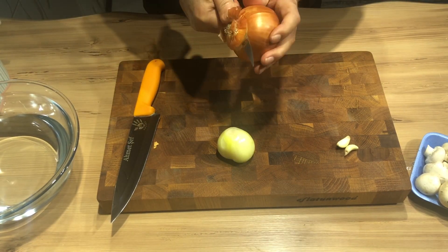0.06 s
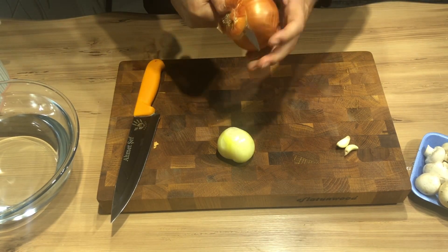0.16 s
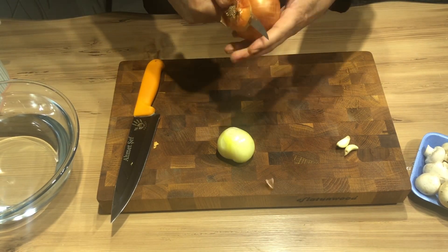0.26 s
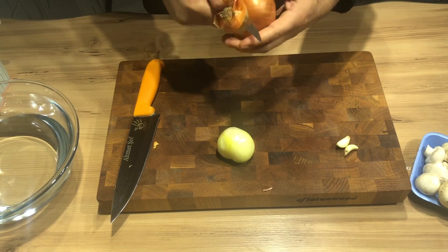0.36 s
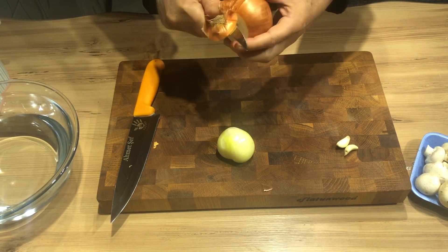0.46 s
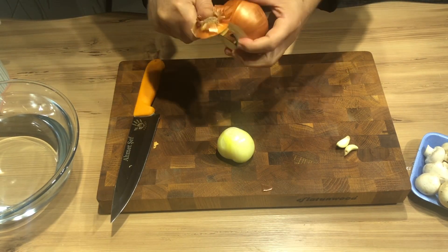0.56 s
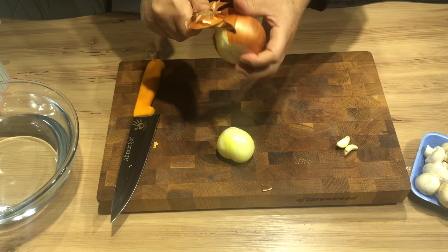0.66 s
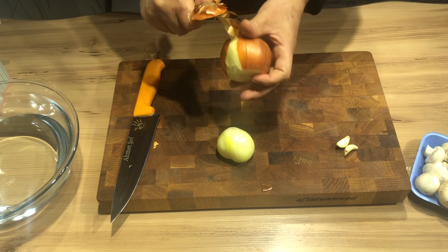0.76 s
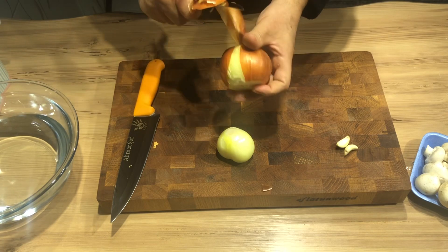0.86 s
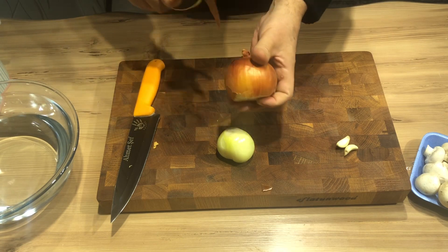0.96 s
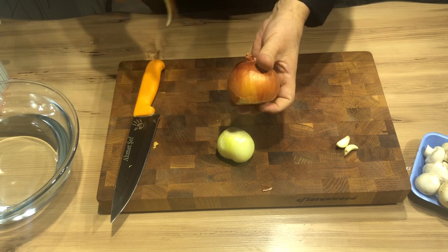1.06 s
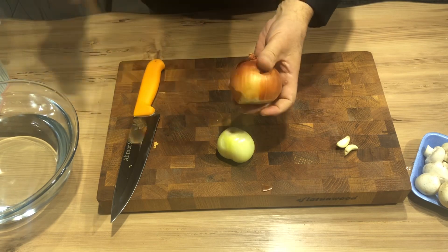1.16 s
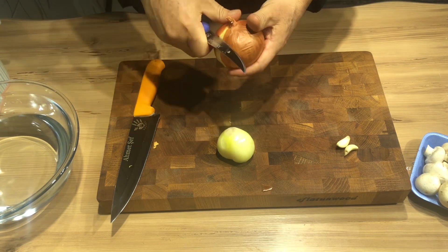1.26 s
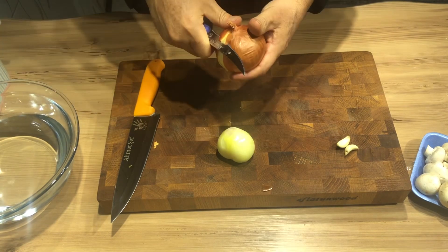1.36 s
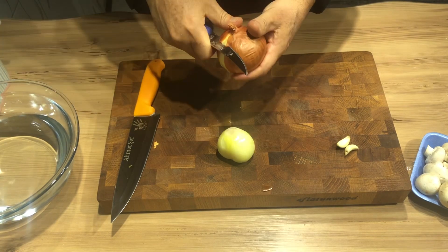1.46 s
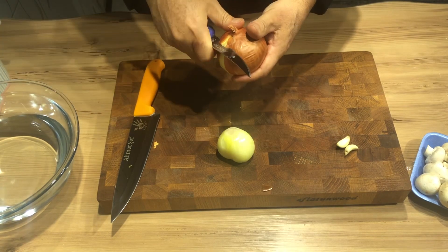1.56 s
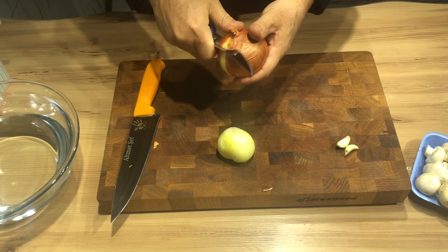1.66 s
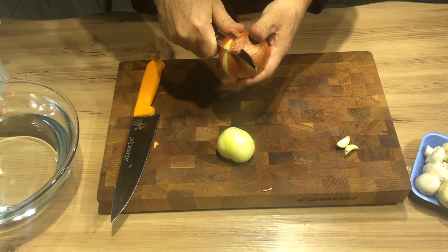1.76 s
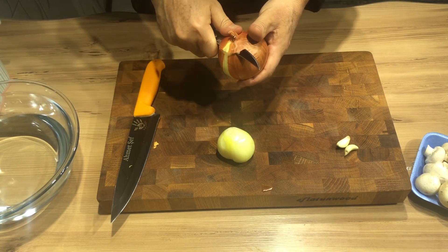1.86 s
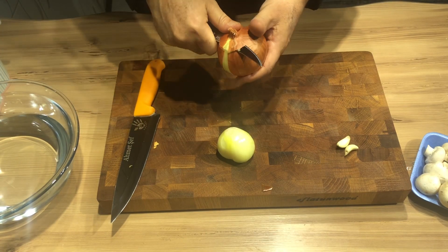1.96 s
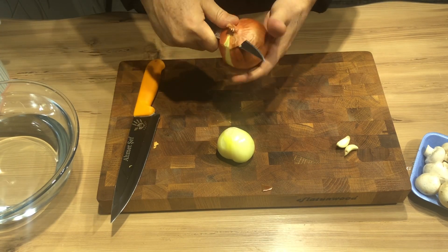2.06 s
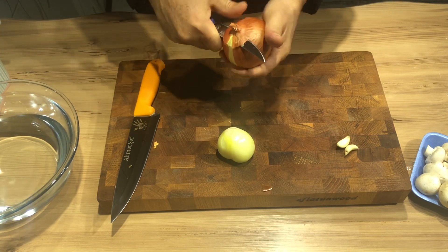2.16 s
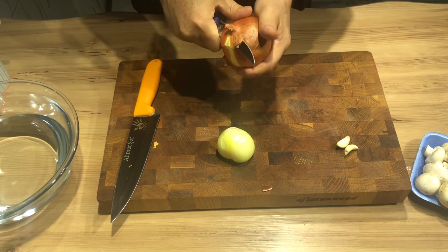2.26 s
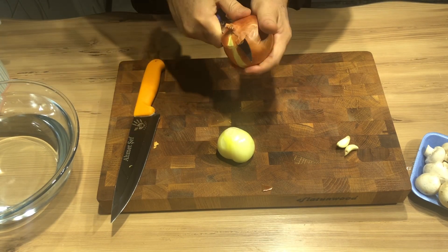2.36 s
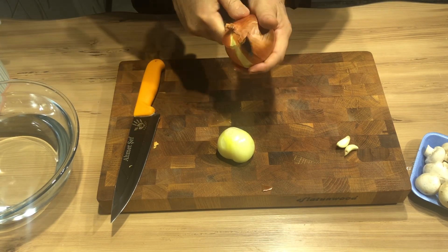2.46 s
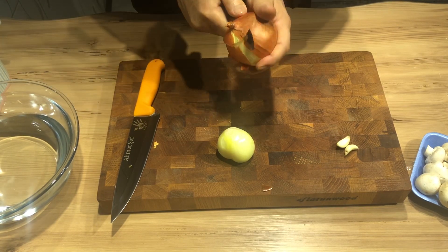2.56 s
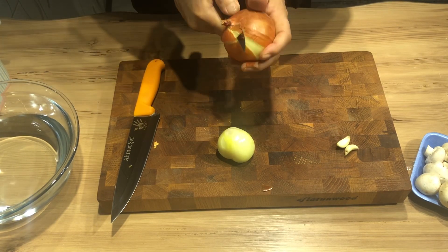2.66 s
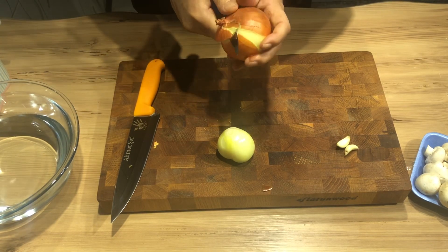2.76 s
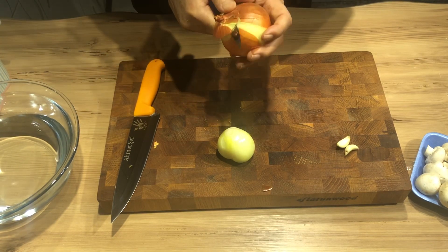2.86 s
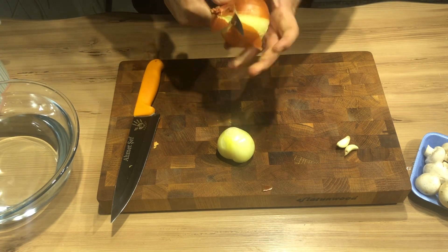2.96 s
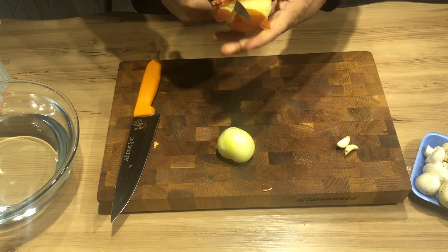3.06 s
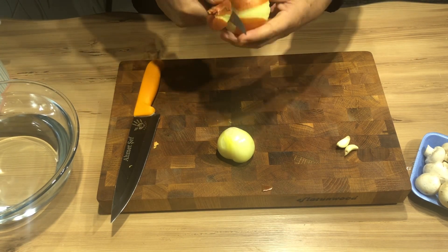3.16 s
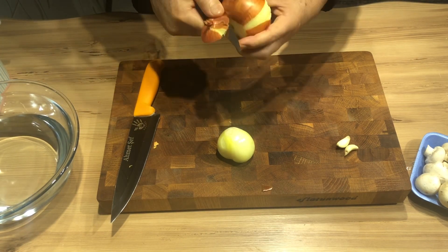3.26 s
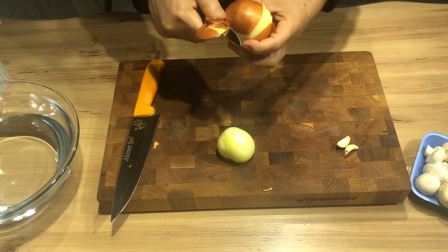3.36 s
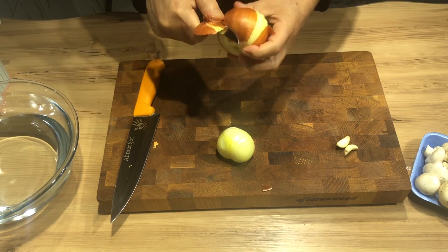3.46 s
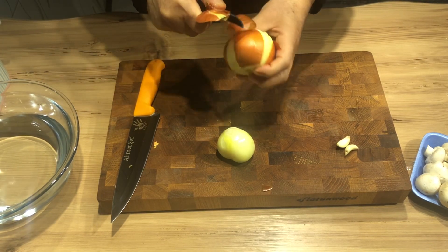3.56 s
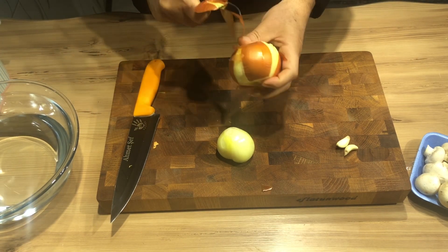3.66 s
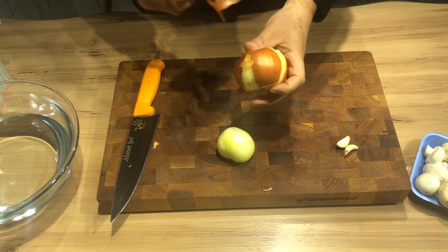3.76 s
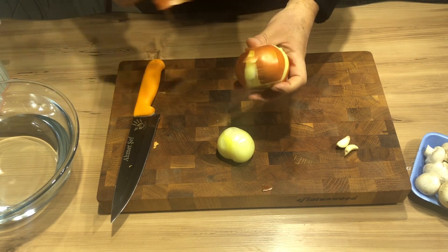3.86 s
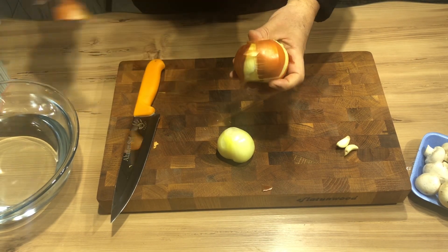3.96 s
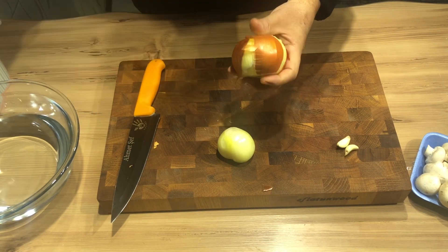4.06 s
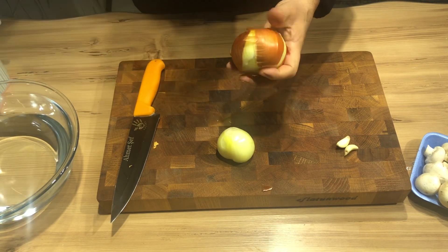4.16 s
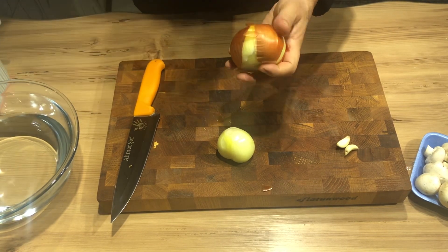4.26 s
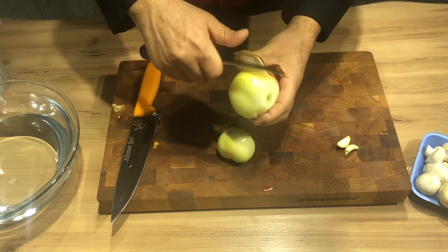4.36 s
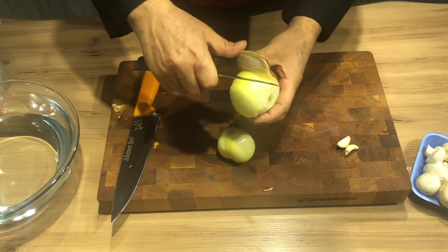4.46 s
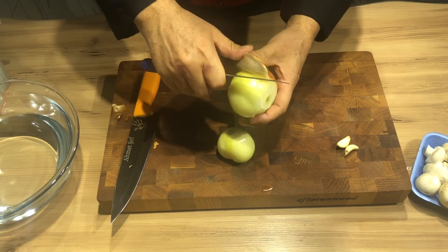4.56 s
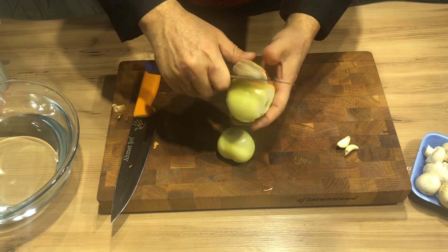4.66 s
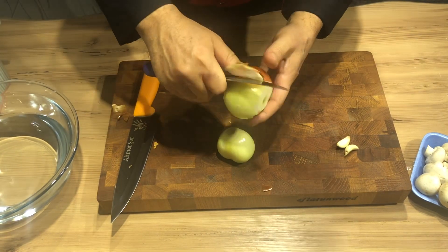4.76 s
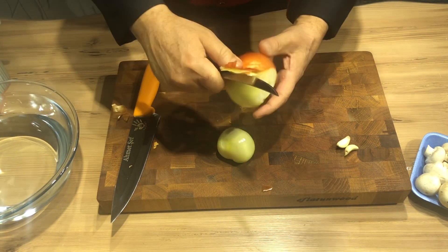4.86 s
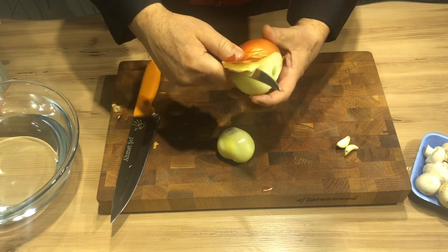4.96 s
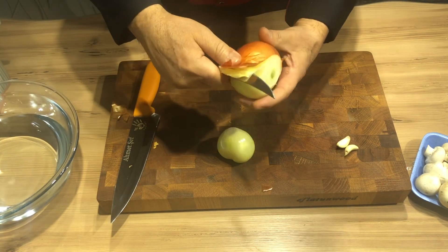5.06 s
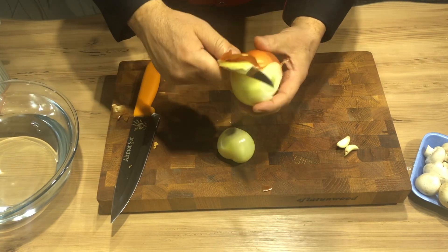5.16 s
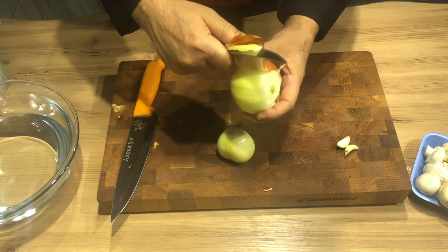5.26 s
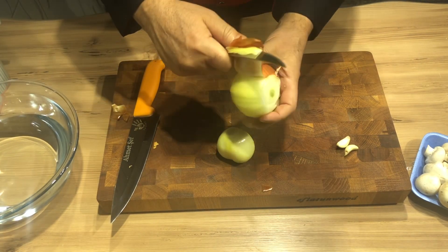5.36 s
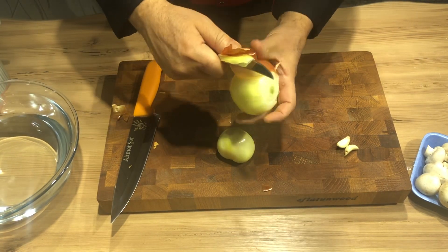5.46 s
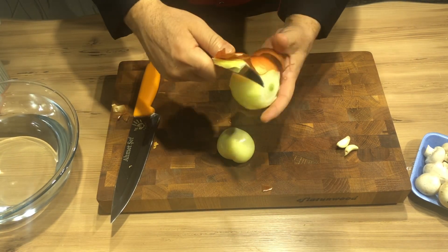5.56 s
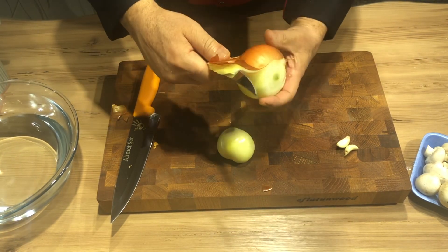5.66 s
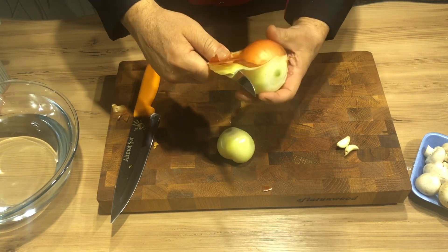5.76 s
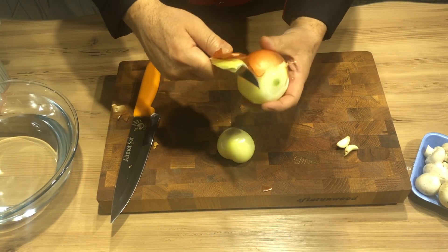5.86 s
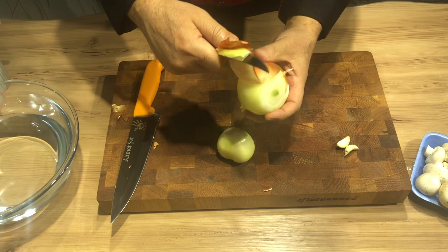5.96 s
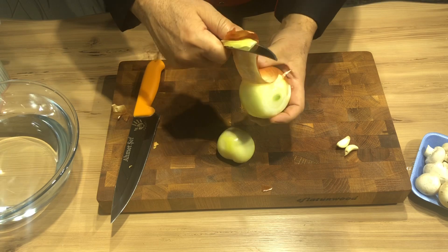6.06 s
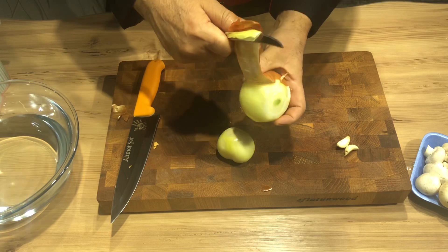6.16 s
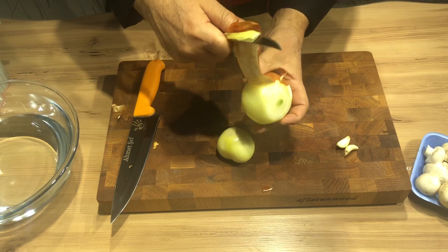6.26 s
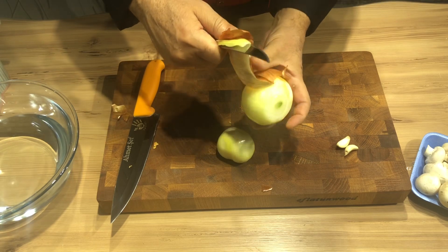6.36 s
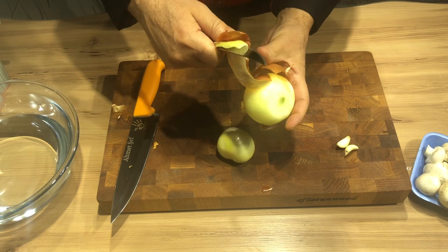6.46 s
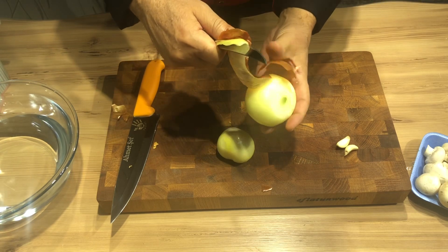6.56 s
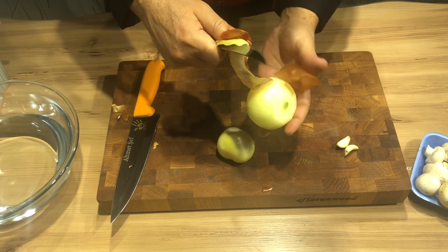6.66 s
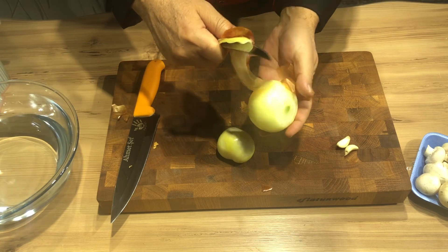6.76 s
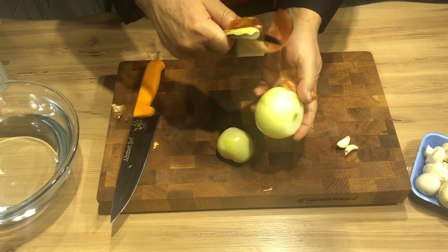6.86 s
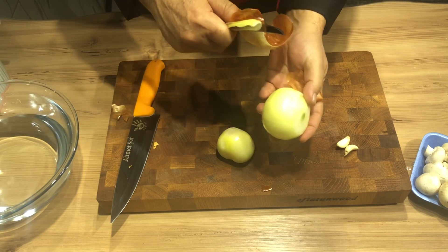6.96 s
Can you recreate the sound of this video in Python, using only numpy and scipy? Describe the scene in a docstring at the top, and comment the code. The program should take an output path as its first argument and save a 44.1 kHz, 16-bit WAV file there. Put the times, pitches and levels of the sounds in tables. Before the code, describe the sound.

Dry, papery onion skin crackles, snaps and tears in irregular bursts close by, with brief scrapes and quiet gaps in a small humming kitchen.

```python
"""Dry onion skin is prised up with a small knife and torn off by hand over a cutting board.
The skin rustles as filtered noise shaped by countless random cracks, and snaps where a larger fold breaks;
short resonances add thumps, knocks and rings, and soft low noise gives rubbing fingers and low thumps.
A small kitchen answers with decaying noise, over room air, an appliance hum and a thin whine."""
import sys
import numpy as np
from scipy import signal
from scipy.fft import rfft, irfft, next_fast_len
from scipy.io import wavfile
from scipy.ndimage import uniform_filter1d, map_coordinates

SR = 44100
rng = np.random.default_rng(int(sys.argv[2]) if len(sys.argv) > 2 else 0)


def master_out(mix):
    """Clip the mix to full scale and print it as 16-bit PCM to the path in sys.argv[1]."""
    frames = np.transpose(np.atleast_2d(mix))
    ceiling = np.clip(frames, -1, 1)
    pcm = np.round(ceiling * 32767).astype(np.int16)
    wavfile.write(sys.argv[1], SR, pcm)


N = 308700

USUAL_DB = -49.5  # an ordinary pull, the reference for crack rate and body weight


def amp(db):
    """Level to amplitude: 20 dB is a factor of ten."""
    return 10 ** (np.asarray(db) / 20)


def unit(x):
    """Normalisation by mean power: each row gets rms 1."""
    return x / np.sqrt(np.mean(x ** 2, axis=-1, keepdims=True) + 1e-30)


def clock():
    """Uniform sampling: the time of every sample in seconds."""
    return np.arange(N) / SR


def along(points, hz):
    """Interpolation on a logarithmic frequency axis through (Hz, value) points."""
    point_hz, values = np.transpose(points)
    return np.interp(np.log(hz + 1), np.log(point_hz + 1), values)


def wobble(rate):
    """Band-limited random modulation: a smooth curve through `rate` random knots a second."""
    knots = rng.standard_normal(int(N * rate / SR) + 4)
    return map_coordinates(knots, [clock() * rate])


def coloured(x, spectrum, size=8192):
    """Minimum-phase filtering: a folded cepstrum gives a causal response, so clicks keep a sharp front."""
    log_gain = np.log(amp(along(spectrum, np.fft.rfftfreq(size, 1 / SR))))
    cepstrum = irfft(log_gain)
    cepstrum[1:size // 2] *= 2
    cepstrum[size // 2 + 1:] = 0
    response = irfft(np.exp(rfft(cepstrum)))
    padded = next_fast_len(x.shape[-1] + size)
    filtered = irfft(rfft(x, padded) * rfft(response, padded), padded)
    return filtered[..., :x.shape[-1]]


def background(air_db=-66.0, drift_rad=0.38, whine_hz=3046, whine_drift_rad=0.61):
    """Stationary noise plus sinusoids with random phase: room air, an unsteady hum and a thin whine."""
    # spectrum of the steady kitchen air: frequency_hz, relative_db
    air_spectrum = [(22, -45), (36, -26), (50, 0.5), (80, -5), (140, -4), (400, -7), (620, -10.5),
                    (800, -14), (1500, -21.5), (3000, -27.5), (8000, -21.5), (16000, -31.5)]
    # appliance tones, before their slow level wobble: frequency_hz, rms_db
    hum_tones = [(98, -73), (143, -73.5), (541, -74.5), (591, -75)]
    # level course of the thin whine: time_s, rms_db
    whine_course = [(0, -76), (4.3, -82), (4.36, -75), (7, -71)]

    def tone(hz, phase_rad):
        """Phase-modulated sinusoid of rms 1."""
        return np.sqrt(2) * np.sin(2 * np.pi * hz * clock() + phase_rad)

    hum = sum(amp(db + 1.6 * wobble(5.6)) * tone(hz, drift_rad * wobble(27)) for hz, db in hum_tones)
    whine_s, whine_db = np.transpose(whine_course)
    whine_level = amp(np.interp(clock(), whine_s, whine_db))
    whine = whine_level * tone(whine_hz, whine_drift_rad * wobble(38))
    air = amp(air_db) * unit(coloured(rng.standard_normal(N), air_spectrum))
    return hum + whine + air


def kitchen(x, build_s=0.003, count=24):
    """Reverberation as exponentially decaying noise; successive tails differ as the hands move about."""
    # reverberation of the kitchen: frequency_hz, t60_s
    decay_times = [(200, 0.97), (1300, 0.81), (3500, 0.51), (9000, 0.28), (16000, 0.16)]
    hz, t, z = signal.stft(rng.standard_normal((count, SR // 2)), SR, nperseg=256)
    decay = amp(-60 * t / along(decay_times, hz)[:, None])
    tails = signal.istft(z * decay, SR, nperseg=256)[1]
    length = tails.shape[1]
    # the first walls answer only after a few milliseconds
    build_up = 1 - np.exp(-(np.arange(length) / SR / build_s) ** 2)
    tails = unit(tails * build_up) / np.sqrt(length)  # each tail has energy 1
    wet = np.zeros(N + SR)
    for part, tail in zip(np.array_split(np.arange(N), count), tails):
        answer = signal.fftconvolve(x[part], tail)
        wet[part[0]:part[0] + len(answer)] += answer
    return wet[:N]


def rubs_and_thumps():
    """Low-passed noise under smooth envelopes: fingers rub on the bulb, and tearing thumps softly."""
    # fingers rubbing on the bulb and low thumps of tearing, as bell-shaped swells:
    # middle_s, half_length_s, level_db
    low_swells = [(0.635, 0.011, -57), (0.937, 0.034, -67), (2.741, 0.022, -62), (3.376, 0.14, -60),
                  (3.529, 0.023, -57.5), (5.2, 0.11, -67), (6.793, .025, -63)]
    # spectrum of these dull sounds: frequency_hz, relative_db
    dull_spectrum = [(40, -30), (140, 2), (200, -6), (290, -1.5), (450, -11.5), (800, -28), (2000, -52),
                     (6000, -89)]
    envelope = sum(amp(db) * np.exp(-((clock() - s) / half) ** 2) for s, half, db in low_swells)
    return envelope * unit(coloured(rng.standard_normal(N), dull_spectrum))


def resonant(x):
    """Forced resonance: for short spells the crackle excites a broad peak at one pitch."""
    # short resonances: low thumps, dull knocks and bright rings in the crackle:
    # middle_s, half_length_s, pitch_hz, gain
    resonances = [(.115, 0.021, 1280, 3), (0.65, 0.011, 420, 4.5), (0.63, 0.011, 670, 4.8),
                  (0.722, 0.048, 3600, 3.1), (.92, .025, 384, 3.6), (1.243, 0.037, 3420, 2.9),
                  (1.683, 0.018, 15500, 1.7), (2.894, 1, 1400, 0.49), (3, 0.7, 4220, 1.2),
                  (4.287, .012, 1690, 8.5), (5.636, 0.012, 1900, 2.3), (5.924, 0.0099, 4130, 1.4),
                  (6.166, 0.054, 2100, 3.4), (6.638, 0.062, 1570, 3.5), (6.755, 0.022, 3100, 2.6),
                  (6.784, 0.0065, 1080, 8.6), (6.79, 0.025, 383, 2.1)]
    out = x.copy()
    for s, half, hz, gain in resonances:
        held = gain * np.exp(-((clock() - s) / half) ** 2)
        out += signal.lfilter(*signal.iirpeak(hz, 4.5, fs=SR), held * x)  # Q of 4.5
    return out


def papery(cracks, body_db, sparkle_db, low_hz=2400, high_hz=9600):
    """Radiation of a thin sheet: coloured cracks in three bands, body and sparkle set against the middle."""
    # spectrum that the dry skin radiates: frequency_hz, relative_db
    skin_spectrum = [(40, -46), (170, -20.5), (400, -15.5), (950, -14.5), (1400, -9), (1900, -8),
                     (2800, -2.5), (3500, 5.5), (4300, 7), (5200, 10.5), (8000, 6.5), (12000, -0.5),
                     (15500, 3)]
    sound = coloured(cracks, skin_spectrum)

    def band(edge_hz, kind):
        """Butterworth band selection, scaled to rms 1."""
        sos = signal.butter(3, edge_hz, kind, fs=SR, output="sos")
        return unit(signal.sosfilt(sos, sound))

    body, sparkle = amp(body_db), amp(sparkle_db)
    middle = band([low_hz, high_hz], "band")
    mix = body * band(low_hz, "low") + middle + sparkle * band(high_hz, "high")
    return mix / np.sqrt(body ** 2 + 1 + sparkle ** 2)


def effort(step=32):
    """Power addition of strokes that catch, build or ease, and let go: pull dB, body dB, sparkle dB, hiss."""
    # pulls that tear the skin: start_s, length_s, level_db (mid-stroke), build_db (start to end), sparkle_db
    tear_strokes = [(0, 0.026, -39.5, -25, -1), (0.079, 0.046, -47, 0, -15), (0.2, 0.2, -63.5, -15, 1),
                    (0.341, 0.13, -47, 4.5, -0.5), (0.486, 0.13, -38, 1, 2), (.622, 0.069, -25.5, -5.5, 3),
                    (0.917, 0.065, -49, -1, -7), (1.472, 0.029, -45.5, -1, -2.5),
                    (1.638, 0.088, -42, 3, 1.5), (1.83, 0.056, -48, 1, -3), (1.974, 0.095, -58.5, -10, 1),
                    (2.475, 0.063, -41, -8, 2), (2.632, 0.22, -53, -7.5, 2.5), (2.861, 0.083, -45, -1, 2.5),
                    (2.95, 0.2, -66, 12.5, 6), (3.331, 0.1, -44, -10.5, 6), (3.453, 0.12, -39, 15.5, 6),
                    (4.09, 0.27, -65.5, -11, 6), (4.63, 0.33, -61, -2, -1.5), (5.082, 0.04, -53.5, 16, 2),
                    (5.117, 0.12, -42.5, 6, -1), (5.246, 0.073, -37, 5, 4), (5.412, 0.18, -56.5, -6.5, 7),
                    (5.586, 0.075, -50, -7.5, -2.5), (5.716, 0.19, -55.5, 7, 0), (5.859, 0.12, -40, 5, 7),
                    (5.968, 0.19, -51.5, -21.5, 2), (6.128, 0.088, -37.5, 4, 9), (6.526, .1, -62, 3, 8),
                    (6.639, 0.091, -49, 12, 2.5), (6.746, 0.048, -39.5, 8.5, -2.5),
                    (6.807, 0.044, -48, 2, -7)]
    # blade or skin sliding without catching: start_s, length_s, level_db, build_db, sparkle_db
    slide_strokes = [(.7, .13, -41, -7, 5), (0.829, 0.088, -39, 10.5, 2), (1.066, 0.14, -55.5, 10, -5),
                     (1.213, 0.084, -49, -6, -1), (1.3, 0.065, -48, 2, -1.5), (2.178, .295, -54.5, 1, -1.5),
                     (2.529, 0.085, -51, 1, 3), (3.11, 0.097, -51, 28, 12), (3.21, 0.11, -46, -4, 10.5),
                     (3.564, 0.11, -42, 1.5, 6)]
    attack_s, release_s = 0.0083, 0.0063  # the skin catches and lets go this fast
    rest_db = -72.5  # the bulb merely held in the hand
    tear_hiss, slide_hiss = 0.08, 0.74  # share of the rustle that is smooth hiss
    body_db, body_per_db = -4.5, -0.153  # low band at an ordinary pull; harder pulls sound thinner
    t = clock()[::step]
    strokes = np.vstack([tear_strokes, slide_strokes])
    start, length, db, build_db, sparkle_db = np.transpose(strokes)[:, :, None]
    age = t - start
    envelope = np.clip(age / attack_s, 0, 1) * np.exp(-np.maximum(age - length, 0) / release_s)
    progress = np.clip(age / length, 0, 1)
    power = (envelope * amp(db + build_db * (progress - .5))) ** 2
    total = power.sum(0) + amp(rest_db) ** 2
    pull_db = 10 * np.log10(total)
    body = body_db + body_per_db * (pull_db - USUAL_DB)
    sparkle = (power * sparkle_db).sum(0) / total  # mean weighted by power
    sliding = power[len(tear_strokes):].sum(0) / total
    hiss = np.clip(tear_hiss + (slide_hiss - tear_hiss) * sliding, 0, 1)
    return [np.interp(clock(), t, c) for c in (pull_db, body, sparkle, hiss)]


def ticks(controls, count=270):
    """Random, uniformly scattered lesser snaps as rows of time_s, level_db, sparkle_db; size follows the pull."""
    over_db, top_db = 5.5, -38.5  # mean level over the rustle before the hiss cut, and the upper limit
    draws = rng.standard_normal((count, 2))
    s = rng.uniform(0, N / SR, count)
    pull_db, _, sparkle, hiss = [c[(s * SR).astype(int)] for c in controls]
    db = pull_db + over_db - 14 * hiss + 3 * draws[:, 0]
    sparkle = sparkle + 3 * draws[:, 1]
    return np.transpose([s, np.minimum(db, top_db), sparkle])


def snaps(rows, spike, flutter_gain, board_gain, size=1024, order=130):
    """Impulsive fracture: a sharp break, a bounce off the board and a short flutter of the freed flake."""
    s, db, sparkle = np.transpose(rows)[:, :, None]
    body = -4.5 - 0.3462 * (db - USUAL_DB)  # low-band weight in dB; faint snaps are duller than loud ones
    t = (np.arange(size) - order) / SR  # the break falls on sample `order`

    def packet(age, life_s):
        """Sudden onset with exponential decay."""
        return (age >= 0) * np.exp(-np.abs(age) / life_s)

    # the hands move and tilt the flake, so the bounce has a new delay and strength each time
    delay_s = rng.uniform(.0011, .0016, (len(s), 1))
    bounce = board_gain * rng.uniform(.3, 1, (len(s), 1))
    swell = packet(t, .00022) + bounce * packet(t - delay_s, .0003)
    # each snap has a random amount of soft noise around its sharp break
    soft_noise = rng.uniform(0, .8, (len(s), 1)) * np.exp(-((t - .001) / .003) ** 2)
    swell += flutter_gain * (packet(t, .0024) + soft_noise)
    crack = swell * rng.standard_normal((len(s), size))
    crack[:, order] = spike
    # a snap's level is its energy spread over 5 ms
    spread = np.sqrt(.005 * SR / size)
    sounds = amp(db) * spread * unit(papery(crack, body, sparkle))
    where = np.abs(np.round(s * SR).astype(int) + np.arange(size) - order)
    return np.bincount(where.ravel(), sounds.ravel(), N)[:N]


def rustle(pull_db, body, sparkle, hiss, rate=430, crowding_db=45):
    """Crackling noise: random cracks come thicker with a harder pull, over the hiss of skin sliding on skin."""
    # `rate` cracks a second at an ordinary pull, ten times as many for each crowding_db above it
    per_second = rate * 10 ** ((pull_db - USUAL_DB) / crowding_db)
    sizes = amp(4.5 * np.clip(rng.standard_normal(N), -2, 2))
    cracks = (rng.random(N) < per_second / SR) * sizes ** 2
    # every crack sets a flake fluttering: its amplitude decays with a 0.6 ms time constant
    energy = signal.lfilter([1], [1, -np.exp(-2 / (.0006 * SR))], cracks)
    # the strain put in by the fingers is shared out among the cracks of each moment
    energy /= np.abs(uniform_filter1d(energy, size=900)) + .03
    grains = np.sqrt((1 - hiss) * energy + hiss) * rng.standard_normal(N)
    # the colour shifts as flakes of different sizes take their turn
    return amp(pull_db) * papery(grains, body + 2 * wobble(45), sparkle + 2 * wobble(45))


def scene(room_db=-8):
    """Superposition of direct and reverberant sound: skin and fingers close by, the kitchen around them."""
    # folds that break: time_s, level_db (energy over 5 ms), sparkle_db (against the middle band)
    fold_breaks = [(.0715, -32.5, -2), (.1121, -35, 0.5), (.361, -33.5, 7), (.4108, -31.5, -2),
                   (.5573, -30.5, 5), (.6112, -25, 8), (.628, -21, 5), (.637, -20.5, 7), (.6498, -25.5, -4),
                   (.9189, -38, -10), (1.0603, -34, -14.5), (1.2157, -40, -8), (1.6588, -45.5, -10),
                   (1.6827, -41, 4), (1.8408, -32.5, 5), (1.8456, -39.5, 2), (1.877, -37, 0),
                   (1.987, -51, -6), (2.059, -47.5, 3), (2.4851, -25.5, 4), (2.7071, -37, 6.5),
                   (2.7763, -37.5, 7), (2.8432, -41.5, 10), (2.8569, -33.5, 6.5), (2.898, -34.5, 5.5),
                   (2.9214, -35, 10), (3.3707, -33.5, 3.5), (3.444, -31, 9), (3.4569, -29.5, 6.5),
                   (3.5046, -27, 2), (3.5091, -20, 7), (3.5363, -22.5, -4), (4.2914, -62.5, -1),
                   (4.562, -56.5, 2), (4.6293, -53.5, -1), (4.672, -50, -2), (4.7487, -49.5, 6),
                   (4.782, -48, 2), (4.9035, -39.5, 7), (4.9407, -42, -10), (5.1202, -40, 13),
                   (5.1937, -32, 2), (5.279, -30, 8), (5.287, -31, -11), (5.3015, -32.5, -3),
                   (5.4808, -31.5, 2), (5.6317, -44.5, -7), (5.7262, -42.5, -5), (5.8263, -42, 5),
                   (5.8568, -33.5, 6), (5.8836, -31, 7), (5.9098, -30, 13), (5.9238, -24.5, -3),
                   (5.95, -26.5, 4.5), (6.1406, -36, 4), (6.1497, -31, -5), (6.1615, -22.5, 8),
                   (6.1963, -26.5, 14), (6.2054, -33, -5), (6.308, -37.5, -4), (6.369, -32.5, -1.5),
                   (6.4558, -25.5, 7.5), (6.622, -46.5, -6), (6.7407, -33.5, 0), (6.746, -32.5, -1.5),
                   (6.7659, -33, 16), (6.7906, -29, 2.5), (6.8487, -40.5, -10), (6.8776, -30, 6)]
    controls = effort()
    handling = rustle(*controls) + rubs_and_thumps()
    breaks = np.vstack([fold_breaks, ticks(controls)])
    direct = resonant(handling + snaps(breaks, spike=1.9, flutter_gain=.42, board_gain=.95))
    # the room is fed a plainer click, so that its tail is smooth
    room_feed = resonant(handling + snaps(breaks, spike=7, flutter_gain=.2, board_gain=0))
    return (direct + amp(room_db) * kitchen(room_feed) + background())[None]


def record(dry):
    """Amplitude modulation, then low-pass filtering: the level dips briefly twice and the top is cut."""
    # brief dips in level: middle_s, half_width_s, depth_db
    level_dips = [(1.296, 0.0076, -33), (4.326, 0.01, -13)]
    top_hz = 16000
    dip_db = sum(depth * np.exp(-((clock() - s) / half) ** 2) for s, half, depth in level_dips)
    padded = next_fast_len(N + SR // 2)
    passband = 1 / (1 + (np.fft.rfftfreq(padded, 1 / SR) / top_hz) ** 160)
    return irfft(rfft(dry * amp(dip_db), padded) * passband, padded)[..., :N]


dry = scene()
out = record(dry)
master_out(out)
```